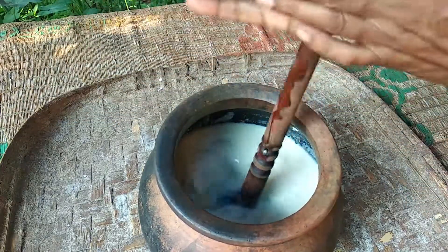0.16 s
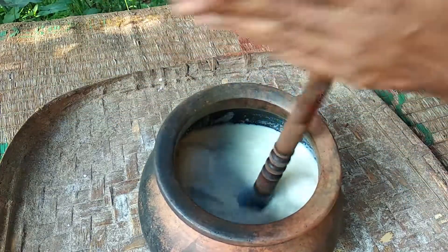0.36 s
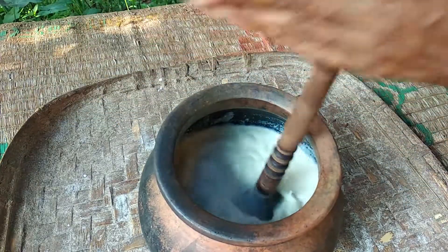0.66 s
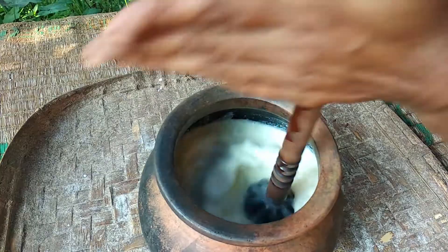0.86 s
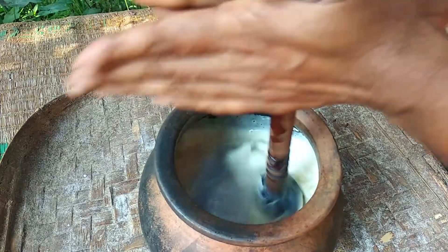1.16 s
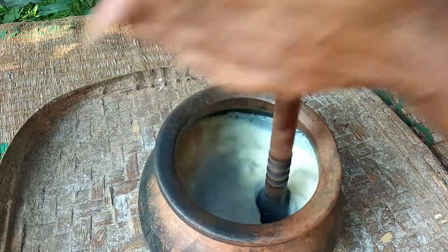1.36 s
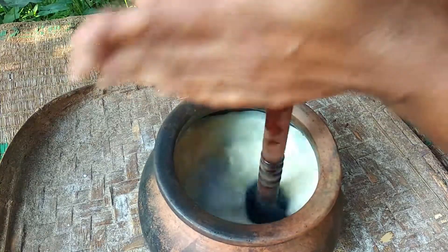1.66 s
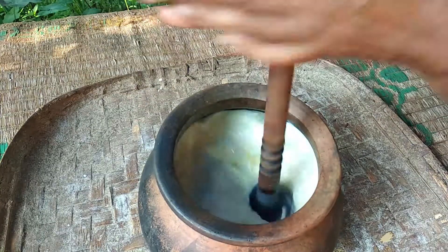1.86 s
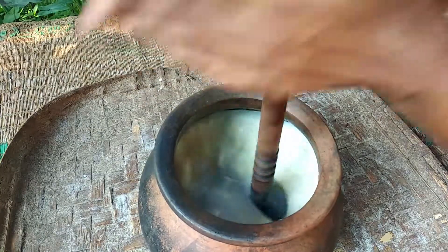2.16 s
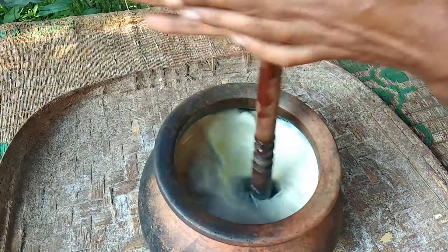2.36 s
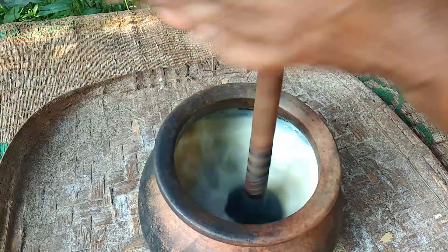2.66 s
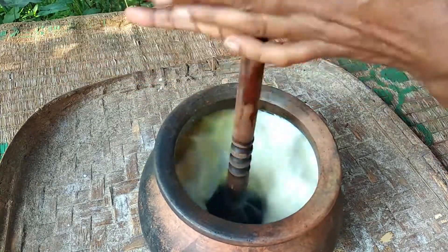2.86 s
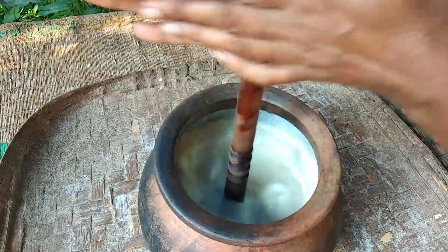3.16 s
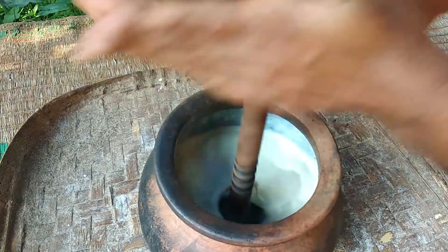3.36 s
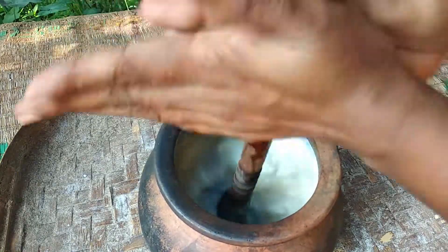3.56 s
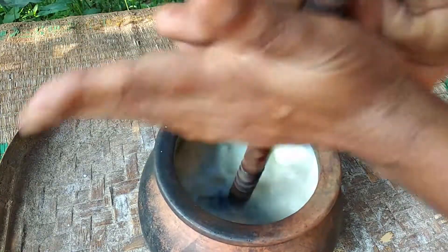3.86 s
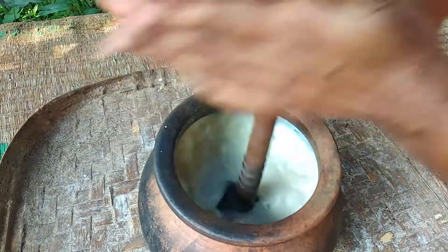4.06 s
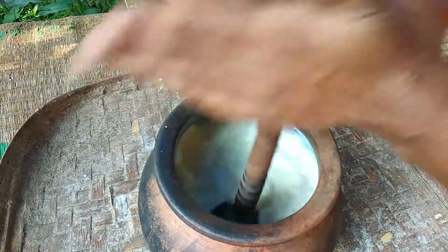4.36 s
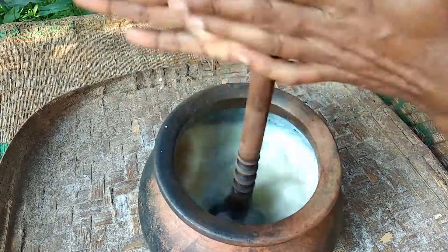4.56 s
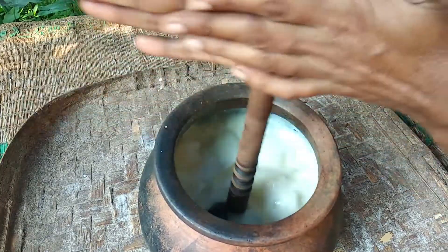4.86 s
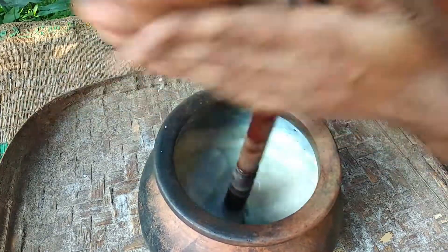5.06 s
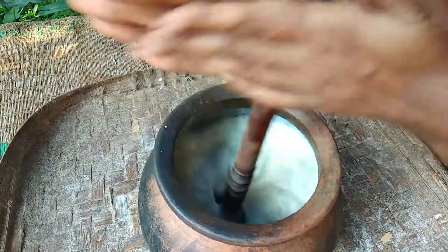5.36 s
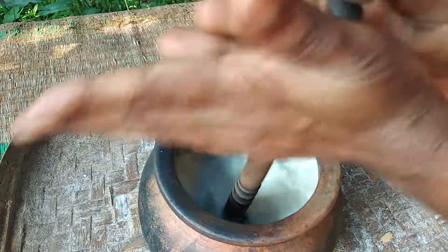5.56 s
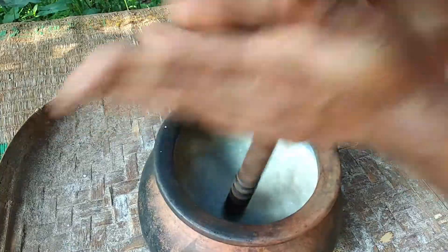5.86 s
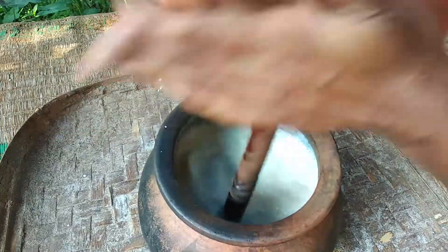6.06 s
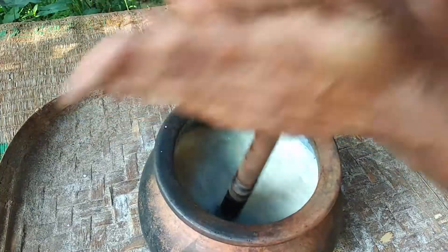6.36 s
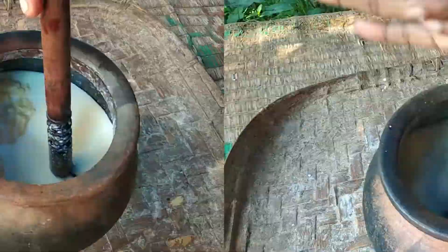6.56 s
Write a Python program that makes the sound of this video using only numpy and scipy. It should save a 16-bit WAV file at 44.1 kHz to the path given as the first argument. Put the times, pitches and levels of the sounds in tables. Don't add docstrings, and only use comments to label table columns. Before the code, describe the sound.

Close, wet, fast rhythmic churning of curd in a clay pot, with hollow gulps, plops, spatter, small wooden taps and hissing skin on wood.

```python
import sys
import numpy as np
from scipy import signal
from scipy.fft import rfft, irfft, next_fast_len
from scipy.io import wavfile
from scipy.ndimage import uniform_filter1d

SR = 44100
rng = np.random.default_rng(int(sys.argv[2]) if len(sys.argv) > 2 else 0)


def decibels_to_gain(level_db):
    exponent = np.asarray(level_db, float) / 20
    return 10 ** exponent


def put_to_file(sound):
    columns = np.atleast_2d(sound).T
    safe = np.clip(columns, -1, 1)
    whole_steps = np.round(safe * 32767)
    wavfile.write(sys.argv[1], SR, whole_steps.astype(np.int16))


N = 295470
PADDED = next_fast_len(N + SR // 4)
HZ = np.maximum(np.arange(PADDED // 2 + 1) * SR / PADDED, 1)
CHURN_END_S, YARD_START_S = 6.581, 6.615
LOW_CUT_HZ = 170

# pitch_hz, level_db (per Hz)
YARD_SPECTRUM = [(24, -52), (40, -22), (170, 1), (298, -22), (442, -15), (922, -31), (3300, -32),
                 (3730, -39), (4010, -29), (5650, -39), (6390, -11), (7400, -19), (8580, -12), (9690, -33),
                 (14000, -38)]
# time_s, level_db
YARD_FADE = [
    (6.63, -76),
    (6.66, -68),
    (6.675, -71),
    (6.7, -62),
]
# pitch_hz, level_db (per Hz)
AIR_SPECTRUM = [(400, -22), (1500, -0.5), (5000, -8), (9000, -0.5), (16000, -5.5)]
# pitch_hz, level_db (per Hz)
RUMBLE_SPECTRUM = [(12, -33), (40, -3.5), (206, -0.5), (265, -3), (300, -41), (390, 10), (660, -120)]
# pitch_hz, level_db (per Hz)
PALM_SPECTRUM = [(4800, -14), (5600, -6.5), (6500, -1), (8500, 0), (10000, -1), (12000, -6), (14000, -9),
                 (16000, -6)]
# start_s, peak_db, centre_hz
SLIPS = [(0.169, -11, 9700), (0.7263, -18, 6350), (1.1215, -18, 7200), (1.2709, -20, 6520),
         (1.381, -18.5, 7900), (1.67, -30, 8370), (1.802, -14, 10900), (2.0176, -13.5, 11500),
         (2.181, -14, 7900), (2.2213, -26, 8100), (2.879, -10.5, 6870), (2.996, -29, 8200),
         (3.128, -13.5, 7450), (3.2115, -11.5, 11800), (3.4302, -14.5, 6500), (3.8045, -12.5, 9100),
         (4.113, -14.5, 8530), (4.6656, -15, 6100), (5.1186, -18, 8700), (5.3917, -20, 7840),
         (5.5346, -9.5, 8950), (5.7455, -17.5, 11900), (5.839, -10.5, 7700), (6.189, -18.5, 7000),
         (6.2557, -20, 8760)]
# centre_hz, width_hz, level_db (not used)
POT_AIR = [(447, 67, 0), (1176, 64, -9), (2280, 144, -11), (2825, 100, -12), (4300, 110, -15),
           (5090, 140, -19)]
POT_LIFT_DB = [4.0, 4.5, 4.2, 5.1, 4.0, 3.5]
# time_s, pitch_hz, level_db (over spray)
NECK_HUM = [
    (0.0, 1160, -8),
    (.7, 1160, -8.5),
    (1.199, 1121, -11),
    (2.5, 1116, -14),
    (3.201, 1155, -12.5),
    (4.5, 1118, -15),
    (5.2, 1131, -18),
    (6.58, 1127, -6),
]
# pitch_hz, level_db, t60_s
CLAY_MODES = [(742, 1, 0.034), (1300, -0.5, 0.025), (1500, -9.5, 0.04), (1990, -15, 0.049)]
# start_s, peak_db
THUDS = [
    (1.1185, -8),
    (2.4337, -20),
    (5.109, -19.5),
]
# start_s, peak_db
KNOCKS = [
    (1.1202, -10),
    (2.0702, -6.5),
    (2.4333, -22.5),
    (3.0016, -2),
    (3.9523, -12.5),
    (4.2684, -13),
    (5.11, -35),
]
# start_s, peak_db
MORE_KNOCKS = [(0.2543, -20), (0.3045, -2), (0.3729, -29.5), (0.4355, -8), (0.512, -8), (0.5866, -12),
               (0.6044, -11.5), (0.7313, -10), (0.8325, -30), (1.3798, -1), (1.4798, -32), (1.6797, -6),
               (2.0696, -7.5), (2.1381, -22), (2.3326, -31), (2.433, -19.5), (2.4834, -8), (3.0011, -3),
               (3.4339, -1), (3.9514, -15), (4.2018, -23.5), (4.2457, -11.5), (4.2658, -8), (4.804, -15),
               (5.1093, -29), (5.6838, -6)]
# start_s, peak_db
SURFACE_BREAKS = [(0.512, -11), (0.73, -7.5), (0.833, -35), (1.269, -9), (2.597, -28), (2.735, -11),
                  (2.855, -11), (3.121, -10), (3.291, -44), (3.423, -23), (3.55, -17), (3.686, -12),
                  (3.801, -26), (4.203, -23), (5.249, -37), (5.394, -19), (5.662, -23), (5.971, -25),
                  (6.115, -10.5), (6.248, -15.5), (6.396, -24.5)]
# start_s, peak_db
SWINGS = [(0.441, -26.5), (0.47, -22.5), (1.116, -29), (1.241, -29), (1.211, -30), (2.632, -36),
          (3.863, -26), (4.131, -26), (5.401, -28), (5.853, -25.5), (4.435, -39), (6.562, -34.5)]
# start_s, peak_db, pitch_hz, wall_db (relative to peak)
GULPS = [(0.163, -12, 438, -3), (0.247, -16.5, 492, -12), (0.44, -21.5, 398, 0), (0.4715, -6, 451, -0.5),
         (2.999, -18.5, 460, -15.5), (.828, -18, 465, -35), (1.1167, -9, 443, -9), (1.238, -13.5, 444, -35),
         (1.536, -14, 557, -19.5), (1.65, -14, 453, -40), (2.175, -8.5, 447, -50), (2.431, -8.5, 430, -22),
         (2.491, -18, 500, -9), (3.166, -13.5, 477, -64), (3.294, -16, 447, -33), (3.46, -26.5, 450, 2.5),
         (3.863, -17.5, 487, -2.5), (4.106, -23.5, 447, -37.5), (4.13, -11.5, 393, -3.5),
         (4.202, -25, 458, 6.5), (4.262, -20.5, 460, -0.5), (4.984, -16.5, 570, -4),
         (5.106, -8.5, 447, -6.5), (5.279, -15.5, 546, -14), (5.401, -13, 445, -5), (5.709, -10, 456, -4),
         (5.976, -11, 425, -10.5), (6.115, -7.5, 535, -14), (6.248, -22, 487, -2.5), (6.402, -20, 478, -8)]
# start_s, peak_db, pitch_hz
GURGLES = [(0.013, -14.5, 468), (0.035, -19, 447), (0.148, -10, 441), (0.19, -19, 448), (0.512, -17.5, 458),
           (0.591, -21, 434), (0.633, -22.5, 474), (0.732, -16, 540), (0.775, -19, 458), (1.27, -26, 431),
           (1.289, -28, 425), (1.349, -24.5, 378), (1.443, -28, 447), (1.483, -27, 400), (2.227, -21, 433),
           (2.306, -23, 503), (2.627, -29, 457), (3.128, -39, 428), (3.964, -22.5, 425), (4.422, -25, 357),
           (4.444, -23, 460), (5.028, -22, 546), (5.184, -22, 522), (5.498, -27, 424), (5.654, -19.5, 400),
           (5.773, -21, 480), (5.858, -18.5, 468), (6.028, -26, 476), (6.133, -18.5, 435),
           (6.279, -30, 484), (6.304, -19, 483), (6.43, -19, 516), (6.564, -22, 329)]
# start_s, peak_db, pitch_hz
STRAY_GURGLES = [
    (.758, -16, 480),
    (1.1, -5.5, 433),
    (3.884, -14.5, 500),
    (3.907, -15.5, 555),
    (5.1, -21, 500),
    (3.486, -24, 490),
    (2.4965, -9.5, 4200),
    (5.4, -19, 2700),
    (7.4, -14, 468),
]
# start_s, peak_db, pitch_hz
PLOPS = [(.161, -19.5, 800), (0.538, -19, 1155), (1.002, -19.5, 1263), (1.121, -17, 745),
         (1.297, -20.5, 770), (1.543, -45, 930), (1.673, -19, 1230), (1.813, -18, 696), (1.889, -13, 800),
         (1.935, -19, 658), (1.969, -15, 1040), (2.371, -20.5, 727), (2.433, -20.5, 674),
         (2.596, -22, 1120), (2.735, -19, 1112), (2.838, -18, 1030), (3.43, -20.5, 1280),
         (3.553, -16.5, 880), (3.694, -20, 1090), (3.838, -18, 805), (4.104, -16, 760),
         (4.264, -20.5, 1560), (4.56, -20.5, 1060), (4.717, -14, 897), (4.895, -16, 784),
         (4.974, -13.5, 860), (5.683, -21, 720), (6.397, -17, 868)]
# start_s, peak_db, pitch_hz
BLIPS = [(.335, -26.5, 950), (0.594, -31, 666), (.836, -17.5, 627), (1.011, -15, 755), (1.271, -26, 900),
         (1.38, -39, 710), (1.768, -25, 1095), (2.053, -21.5, 800), (2.092, -28, 1085), (2.11, -16.5, 746),
         (2.15, -19.5, 700), (3.293, -24, 1122), (3.816, -26, 696), (3.971, -23.5, 1160),
         (4.02, -19.5, 904), (5.135, -23, 790), (5.16, -32, 890), (5.779, -20.5, 730), (5.972, -22, 853),
         (6.117, -19, 553), (6.253, -24, 1108)]
# start_s, peak_db, pitch_hz
DROPS = [(.306, -12, 2210), (.3722, -11.5, 2070), (.4363, -18, 2320), (.5117, -16, 2090),
         (.6035, -13, 2280), (.8325, -17.5, 2070), (1.1205, -22, 1880), (1.271, -19, 1890),
         (1.5329, -19, 1920), (1.5715, -16.5, 2230), (1.679, -13, 1910), (1.8243, -14.5, 1925),
         (2.068, -14.5, 2000), (2.139, -12, 2015), (2.3317, -16, 2080), (2.4344, -16, 1870),
         (2.866, -21.5, 2200), (3.5508, -25, 2330), (4.2677, -13.5, 2280), (4.332, -15.5, 1990),
         (4.5511, -16.5, 2190), (5.1425, -17.5, 2180), (5.4087, -18.5, 2320), (5.705, -15, 2180),
         (5.9783, -20, 2210)]
# start_s, peak_db, pitch_hz
SPATTER = [(.255, -19.5, 2880), (0.7374, -16.5, 4300), (1.3803, -17, 3500), (1.48, -17, 3200),
           (1.604, -18.5, 2790), (1.9434, -12, 3340), (2.484, -14.5, 2950), (3.0004, -11.5, 2805),
           (3.294, -25, 2960), (3.435, -19, 4300), (3.5635, -18, 2740), (3.9521, -6.5, 4130),
           (4.16, -17.5, 2690), (4.2022, -16, 4300), (4.807, -16.5, 3060), (4.829, -14, 2660),
           (5.109, -19, 2840)]
# start_s, peak_db, pitch_hz
FLECKS = [(0.304, -15, 4340), (0.409, -20, 4080), (.5935, -19, 2400), (.7312, -34, 2430),
          (1.2715, -18, 3320), (1.7918, -30, 2540), (2.068, -17.5, 2830), (2.151, -16, 1980),
          (2.304, -21.5, 2620), (2.413, -18, 1910), (2.434, -14.5, 2900), (2.8619, -27, 5130),
          (3.8372, -24, 2800), (3.97, -35, 2950), (4.246, -27, 2780), (4.5665, -20, 2800),
          (5.143, -16.5, 4240), (5.264, -24, 4060), (5.4081, -14, 3220), (5.746, -16, 5100),
          (5.8282, -22, 2820)]
# pitch_hz, level_db (per Hz)
SLOSH_SPECTRUM = [(200, -11.5), (270, -15.5), (340, -17.5), (450, 12), (620, -43.5), (900, -43.5)]
# pitch_hz, level_db (per Hz)
FROTH_SPECTRUM = [(450, -4.5), (680, 1.5), (850, 3), (1150, -4), (1500, -5.5), (1900, -42)]
# pitch_hz, level_db (per Hz)
SPRAY_SPECTRUM = [(1300, -8), (1700, -4), (2100, 2), (3000, 0.5), (3700, -2), (4400, -2), (5000, -9),
                  (6200, -12.5)]
# time_s, vigour_db, depth_db (extra slosh), grip_db (extra rub)
FORWARD_ROLLS = [(.005, -29, 2, -8), (0.316, -26, -5, -3), (0.603, -25.5, 0.5, -3.5),
                 (.89, -25, -9.5, -3.5), (1.144, -27, -11, -1.5), (1.409, -27, -13.5, 0),
                 (1.692, -25.5, -8.5, 0.5), (1.963, -24.5, -15.5, 0), (2.219, -24, -17, 1),
                 (2.491, -32, 7, -1.5), (2.755, -28, -13.5, 1.5), (3.002, -22.5, -22.5, -3),
                 (3.3, -34, 7.5, -2.5), (3.575, -31, 1, 0), (3.852, -27, -10, 0.5), (4.134, -27, 3, -6),
                 (4.422, -34, -2.5, 4), (4.692, -31.5, -15, 7.5), (4.983, -29, 1, -4),
                 (5.275, -31.5, 4, 3.5), (5.551, -31, -14, 3.5), (5.829, -33.5, 8, -4), (6.129, -36, 7, -2),
                 (6.418, -34.5, 6, -2.5)]
# time_s, vigour_db, depth_db (extra slosh), grip_db (extra rub)
BACK_ROLLS = [(0.169, -24, 3.5, -8.5), (0.452, -26, 5.5, -4), (.749, -24, -12, -1.5), (1.014, -27, -13, 2),
              (1.296, -29.5, -0.5, -1.5), (1.556, -24, -11, -4), (1.838, -25, -26, -3),
              (2.092, -26.5, -25, 1.5), (2.359, -30, -45, 2), (2.631, -29.5, 2.5, -9),
              (2.902, -24.5, -45, 2), (3.143, -37.5, 6, 1), (3.448, -31, 0, -8.5), (3.721, -28, -26, -0.5),
              (3.985, -23.5, -31, 0), (4.276, -27, 2, -4), (4.572, -26, -11, 0), (4.828, -29.5, -12, 0),
              (5.138, -29, -4, -2), (5.418, -30, 1.5, 0), (5.703, -30, 10, -4.5), (5.997, -29, 0.5, 0.5),
              (6.278, -32.5, 4.5, -6), (6.574, -34.5, 0.5, -6)]
# time_s, wash_db (what is left)
FAR_TURNS = [(0.087, -44), (0.399, -40.5), (.692, -46), (.952, -36.5), (1.246, -29.5), (1.501, -35),
             (1.766, -37), (2.023, -35), (2.294, -38), (2.565, -43), (2.824, -34.5), (3.073, -41.5),
             (3.391, -51.5), (3.658, -41.5), (3.912, -40), (4.224, -46), (4.479, -38.5), (4.775, -38),
             (5.06, -43.5), (5.351, -41), (5.644, -42), (5.903, -45), (6.22, -49.5), (6.504, -50)]
# time_s, wash_db (what is left)
NEAR_TURNS = [(0.228, -41), (0.553, -34.5), (0.808, -37), (1.083, -32), (1.353, -34), (1.636, -31.5),
              (1.892, -30), (2.167, -29.5), (2.41, -28.5), (2.679, -36.5), (2.966, -31.5), (3.254, -46),
              (3.521, -40), (3.782, -40), (4.08, -37), (4.375, -38.5), (4.634, -35), (4.942, -32),
              (5.2, -37.5), (5.477, -32.5), (5.789, -32.5), (6.039, -37.5), (6.341, -45)]
# time_s, froth_db (over spray)
AERATION = [
    (0, -8),
    (1.2, 4),
    (2.1, 5),
    (2.8, -9.5),
    (3.5, 1),
    (4.6, -2),
    (5.1, -0.5),
    (6.6, 0.5),
]
# slosh_db, froth_db, spray_db, rub_db
REST_DB = [-1.5, -2, -6.5, -6]
# pitch_hz, likeness (0 to 1)
PORT_LIKENESS = [(60, 0.75), (130, 0.94), (290, 0.98), (640, 0.94), (1200, 0.32), (2200, 0.75), (4000, 0.2),
                 (7000, .0), (15000, 0.0018)]
# pitch_hz, left_minus_right_db
PORT_LEAN = [(60, 0), (110, 0), (200, 0.5), (380, 2), (700, -4), (1290, 3), (2380, 1), (4400, -.5),
             (8120, 3), (15000, 0)]


def rms_one(x):
    return x / np.sqrt(np.mean(x ** 2) + 1e-20)


def at_hz(points, hz=HZ):
    table_hz, value = np.transpose(points)
    return np.interp(np.log(hz), np.log(table_hz), value)


def filtered(x, response):
    return irfft(rfft(x, PADDED) * response, PADDED)[..., :N]


def butter(x, order, hz, kind):
    return signal.sosfilt(signal.butter(order, hz, kind, fs=SR, output="sos"), x)


def patches(level_db, patchy_db):
    r = np.exp(-80 * np.pi * 19.75 / SR)
    slow = signal.lfilter([1], [1, -2 * r, r * r], rng.standard_normal(N // 40 + 2002))[2000:]
    return np.repeat(decibels_to_gain(level_db + patchy_db * rms_one(slow)), 40)[:N]


def coloured(spectrum):
    return rms_one(filtered(rng.standard_normal((2, N)), decibels_to_gain(at_hz(spectrum))))


def grains(spectrum, per_s, cycles, spread_db, noise_share, patchy_db, together, count):
    sizes = decibels_to_gain(spread_db * np.minimum(rng.exponential(1, (2, N)), 4)) * rng.choice([-1, 1], (2, N))
    clicks = rms_one(sizes * (rng.random((2, N)) < per_s / SR))
    dealt = rng.integers(0, count, N)
    bed = rng.standard_normal((2, 2, N))
    out = 0
    for k, hz in enumerate(np.geomspace(spectrum[0][0], spectrum[-1][0], count)):
        bursts = clicks * (np.sqrt(count) * (dealt == k) + together)
        drive = (1 - noise_share) * bursts + noise_share * bed[k % 2]
        r, w = decibels_to_gain(-60 * hz / (cycles * SR)), 2 * np.pi * hz / SR
        ring = [1, 0, -1, 1, -2 * r * np.cos(w), r * r]
        voice = rms_one(signal.sosfilt([ring, ring], drive))
        out = out + voice * (np.sqrt(hz) * patches(at_hz(spectrum, hz), patchy_db))
    return rms_one(out)


def bubbles(table, cycles, rise, onset_cycles, gain_db):
    out, t = np.zeros((2, N + SR)), np.arange(SR // 10) / SR
    for (s, peak_db, hz, *_), (turn, life, place) in zip(table, rng.random((len(table), 3))):
        turns = hz * t
        decay = decibels_to_gain(-60 * turns / (cycles * (0.82 + 2.06 * life)))
        shape = (1 - np.exp(-turns / onset_cycles)) * decay
        gliding = turns * (1 - rise + rise * turns / 8)
        tone = np.sin(2 * np.pi * (gliding + turn / 4 + np.array([[0], [place]])))
        out[:, round(s * SR):][:, :len(t)] += decibels_to_gain(peak_db + gain_db) * shape / shape.max() * tone
    return out[:, :N]


def cracks(table, band_hz, gain_db, length_s):
    out, t = np.zeros((2, N + SR)), np.arange(SR // 12) / SR
    swell = t / length_s * np.exp(1 - t / length_s)
    for (s, peak_db, *_), burst in zip(table, rng.standard_normal((len(table), 2, len(t)))):
        out[:, round(s * SR):][:, :len(t)] += decibels_to_gain(peak_db + gain_db) * burst * swell
    return butter(out[:, :N], 2, band_hz, "band")


def yard():
    t = np.arange(N) / SR
    return decibels_to_gain(np.interp(t, *np.transpose(YARD_FADE))) * coloured(YARD_SPECTRUM)


def still_air():
    return patches(-58.0, patchy_db=2.5) * coloured(RUMBLE_SPECTRUM) + decibels_to_gain(-48) * coloured(AIR_SPECTRUM)


def slips():
    swell_s, lag_s, span = 0.0087, 0.0022, 1.21
    out, t = np.zeros((2, N + SR)), np.arange(SR // 20) / SR
    middle_s = t.mean()
    for (s, peak_db, hz), burst in zip(SLIPS, rng.standard_normal((len(SLIPS), 2, len(t)))):
        hiss = rms_one(butter(burst, 2, [hz / span, min(hz * span, SR / 2.2)], "band"))
        puff = hiss * np.exp(-((t - middle_s) / swell_s) ** 2 / 2)
        out[:, round((s + lag_s - middle_s) * SR):][:, :len(t)] += decibels_to_gain(peak_db - 15.0) * puff
    return out[:, :N]


def palms(rub_gain):
    rub = grains(PALM_SPECTRUM, 4400, cycles=18.8, spread_db=1.0, noise_share=0.72, patchy_db=2.9,
                 together=2.7, count=17)
    grip = patches(0.87, patchy_db=2.2)
    return grip * rub_gain * rub + slips()


def pot_air():
    modes = zip(POT_AIR, POT_LIFT_DB)
    return 1 + sum((decibels_to_gain(db) - 1) / (1 + 2j * (HZ - hz) / width) for (hz, width, _), db in modes)


def neck(wash_gain):
    s, hz, db = np.transpose(NECK_HUM)
    t = np.arange(N) / SR
    slow = butter(rng.standard_normal((2, 2, N)), 2, 39.4, "low")
    phase = 2 * np.pi * np.cumsum(np.interp(t, s, hz)) / SR
    hum = rms_one(slow[0] * np.cos(phase) + slow[1] * np.sin(phase))
    return wash_gain * decibels_to_gain(np.interp(t, s, db)) * hum


def thuds():
    out, t = np.zeros((2, N + SR)), np.arange(SR // 10) / SR
    for s, peak_db in THUDS:
        ring = sum(decibels_to_gain(peak_db + db - 60 * t / t60) * np.sin(2 * np.pi * hz * t) for hz, db, t60 in CLAY_MODES)
        out[:, round(s * SR):][:, :len(t)] += ring * np.minimum(t / 0.002, 1)
    return out[:, :N]


def film_pricks():
    born = rng.random(N) < 260 / SR
    pricks = born * rng.standard_normal((2, N)) + 1e-18
    return rms_one(butter(pricks, 2, [1200, 6700], "band"))


def contacts(spray_gain):
    hits = cracks(MORE_KNOCKS, [1300, 7000], gain_db=-10.0, length_s=0.0005) + thuds()
    late = bubbles(STRAY_GURGLES, cycles=16.0, rise=0.02, onset_cycles=0.8, gain_db=-6.0)
    prickle = decibels_to_gain(-10.5) * spray_gain * film_pricks()
    return butter(filtered(hits + late + prickle, pot_air()), 2, 2 * LOW_CUT_HZ, "high")


def clay_lows():
    wall = [(s, peak_db + wall_db, 333 * (hz / 460) ** 0.26) for s, peak_db, hz, wall_db in GULPS]
    swing = [(s, peak_db, 223) for s, peak_db in SWINGS]
    low = bubbles(wall, cycles=8.0, rise=0.0094, onset_cycles=0.6, gain_db=-1.0)
    return low + bubbles(swing, cycles=5.9, rise=0.016, onset_cycles=0.22, gain_db=1.5)


def surface_hits():
    slaps = cracks(DROPS + SPATTER, [1200, 6600], gain_db=-11.0, length_s=0.0012)
    breaks = cracks(SURFACE_BREAKS, [700, 8300], gain_db=-14.5, length_s=0.0055)
    return slaps + breaks + cracks(KNOCKS, [1200, 7000], gain_db=-7.5, length_s=0.0005)


def pockets():
    wide = [row for row in PLOPS + BLIPS if row[2] < 1000]
    small = [row for row in PLOPS + BLIPS if row[2] >= 1000]
    out = bubbles(GULPS + GURGLES, cycles=13.0, rise=0.055, onset_cycles=1.7, gain_db=-6.0)
    out = out + bubbles(wide, cycles=26.0, rise=0.04, onset_cycles=0.8, gain_db=-5.0)
    out = out + bubbles(small, cycles=40.0, rise=0.015, onset_cycles=1.2, gain_db=-4.0)
    return out + bubbles(DROPS + SPATTER + FLECKS, cycles=42.0, rise=0.008, onset_cycles=2.5, gain_db=-6.0)


def wash(slosh_gain, froth_gain, spray_gain):
    slosh = grains(SLOSH_SPECTRUM, 700, cycles=5.8, spread_db=1.8, noise_share=0.52, patchy_db=2.8,
                   together=0.064, count=8)
    froth = grains(FROTH_SPECTRUM, 500, cycles=15.7, spread_db=2.0, noise_share=0.58, patchy_db=5.0,
                   together=1.0, count=12)
    spray = grains(SPRAY_SPECTRUM, 1300, cycles=20.0, spread_db=2.6, noise_share=0.5, patchy_db=3.0,
                   together=1.2, count=16)
    stirred = decibels_to_gain(-3.0) * slosh_gain * slosh + decibels_to_gain(-1.0) * (froth_gain * froth + spray_gain * spray)
    return patches(0.045, patchy_db=0.5) * stirred


def curd(slosh_gain, froth_gain, spray_gain):
    hum = neck(np.sqrt(spray_gain * decibels_to_gain(-33.5)))
    inside = wash(slosh_gain, froth_gain, spray_gain) + hum + pockets() + surface_hits()
    return butter(filtered(inside, pot_air()) + clay_lows(), 2, LOW_CUT_HZ, "high")


def stroke_levels(roundness):
    roll_s, vigour_db, depth_db, grip_db = np.transpose(FORWARD_ROLLS + BACK_ROLLS)
    froth_db = np.interp(roll_s, *np.transpose(AERATION)) + 0.29 * depth_db
    peaks = vigour_db + depth_db, vigour_db + froth_db, vigour_db, vigour_db + grip_db
    turn_s, wash_db = np.transpose(FAR_TURNS + NEAR_TURNS)
    mean_db = -46.5
    thick_db = mean_db + 0.72 * (wash_db - mean_db)
    rests = np.array([thick_db, thick_db, wash_db, wash_db]) + np.array(REST_DB)[:, None]
    times = np.r_[roll_s, turn_s]
    order, steps = np.argsort(times), np.arange(len(times))
    place = np.interp(np.arange(N) / SR, times[order], steps)
    place = place - 0.19 * np.sin(2 * np.pi * place) / (2 * np.pi)
    gains = []
    for top, rest in zip(peaks, rests):
        joined = np.interp(place, steps, decibels_to_gain(np.r_[top, rest])[order] ** roundness)
        gains.append(joined ** (1 / roundness))
    return gains


def two_ports(x):
    alike = np.clip(at_hz(PORT_LIKENESS), 0, 0.999)
    side = filtered(x[1], np.sqrt((1 - alike) / (1 + alike)))
    lean = decibels_to_gain(at_hz(PORT_LEAN) / 2)
    return filtered(np.array([x[0] + side, x[0] - side]), np.array([lean, 1 / lean]))


def scene():
    slosh_gain, froth_gain, spray_gain, rub_gain = stroke_levels(roundness=0.058)
    churn = still_air() + palms(rub_gain) + contacts(spray_gain) + curd(slosh_gain, froth_gain, spray_gain)
    return two_ports(np.where(np.arange(N) / SR < YARD_START_S, churn, yard()))


def starved_bands(x, margin_db, depth_db, from_hz):
    hz, _, cells = signal.stft(np.array([x[0] + x[1], x[0] - x[1]]) / 2, SR, nperseg=1024)
    power = uniform_filter1d(np.abs(cells) ** 2, size=3, axis=2)
    narrow, broad = uniform_filter1d(power, size=4, axis=1), uniform_filter1d(power, size=40, axis=1)
    narrow = narrow[:, np.minimum(np.arange(len(hz)) // 5 * 5 + 2, len(hz) - 1)]
    limit = broad * decibels_to_gain(2 * margin_db + 2 * (hz[:, None] > SR / 4))
    weak = (narrow < limit) & (hz[:, None] > from_hz)
    mid, side = signal.istft(cells * np.where(weak, decibels_to_gain(depth_db), 1), SR, nperseg=1024)[1][:, :N]
    return np.array([mid + side, mid - side])


def low_pass(x):
    return signal.sosfilt(signal.butter(12, 15970, fs=SR, output="sos"), x)


def record(dry):
    thinned = starved_bands(dry, margin_db=-2.0, depth_db=-28.0, from_hz=4300)
    rolled_off = signal.sosfilt(signal.cheby2(12, 60, 16200, fs=SR, output="sos"), thinned)
    t = np.arange(N) / SR
    churn_on = np.clip((CHURN_END_S - t) / 0.0004, 0, 1)
    yard_on = np.clip((t - YARD_START_S - 0.012) / 0.004, 0, 1)
    return low_pass(rolled_off * (churn_on + yard_on))


dry = scene()
out = record(dry)
put_to_file(out)
```